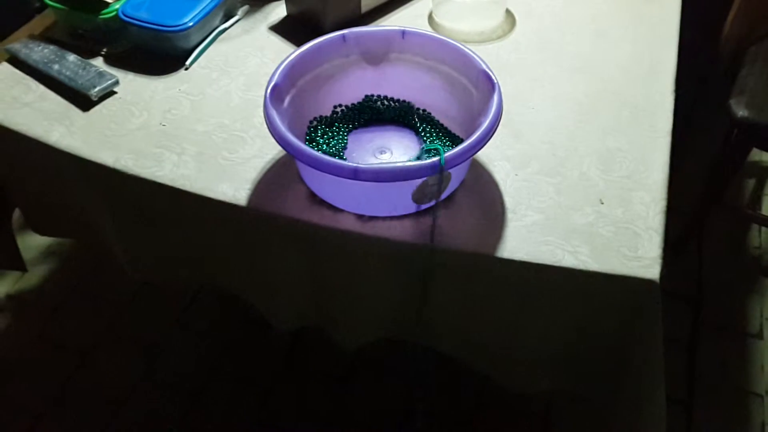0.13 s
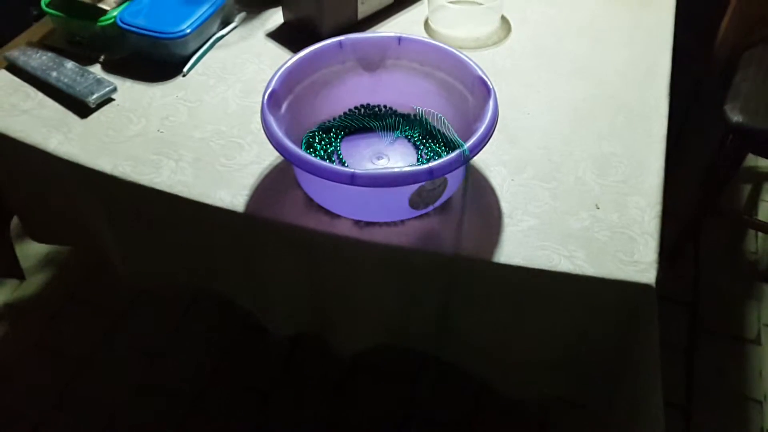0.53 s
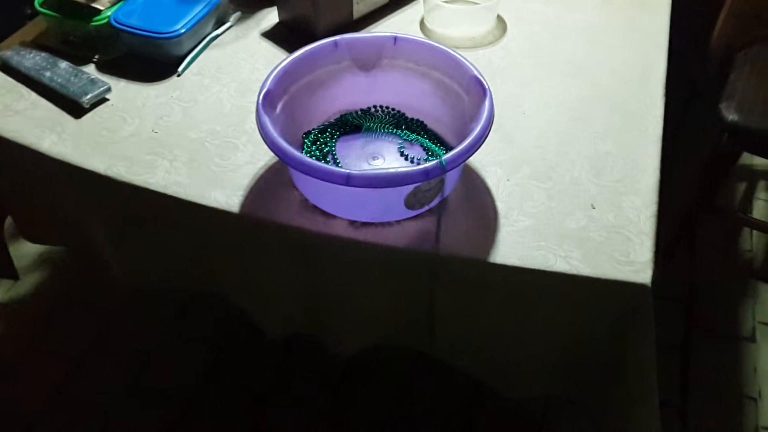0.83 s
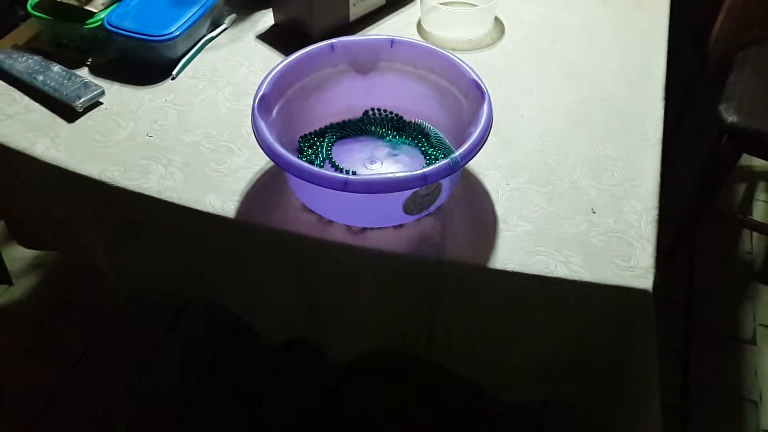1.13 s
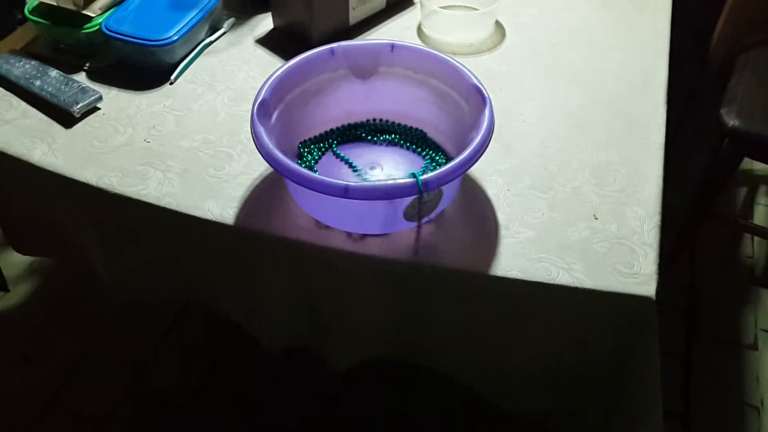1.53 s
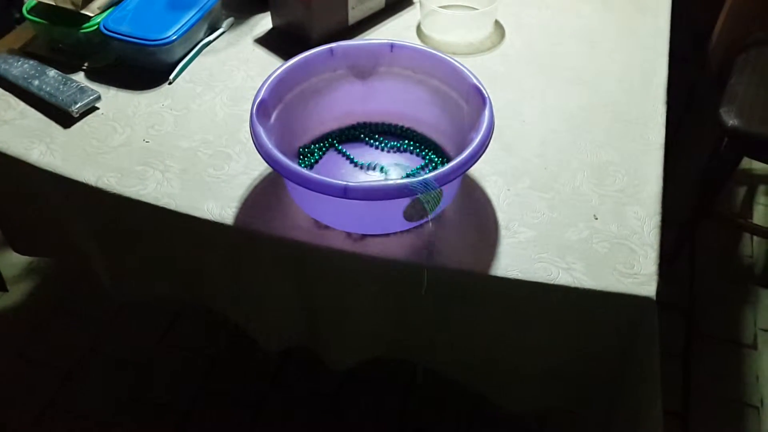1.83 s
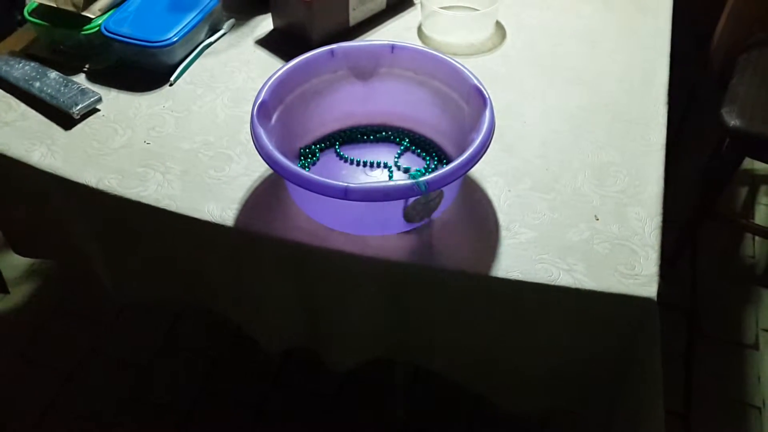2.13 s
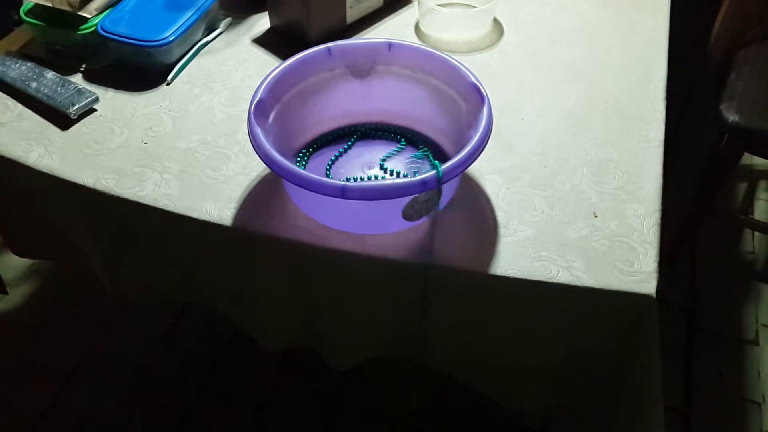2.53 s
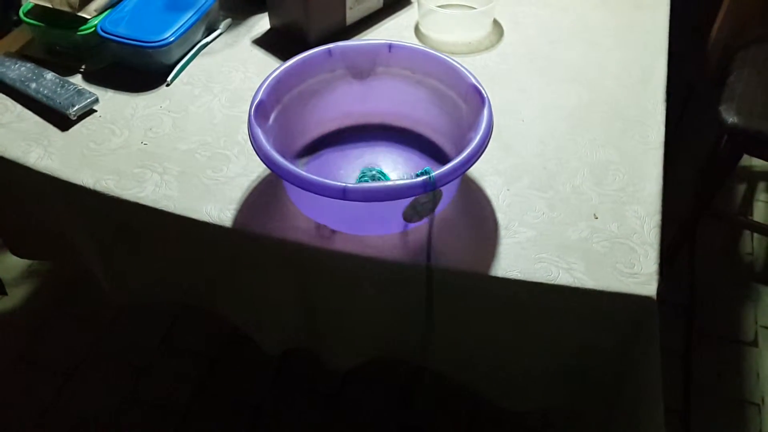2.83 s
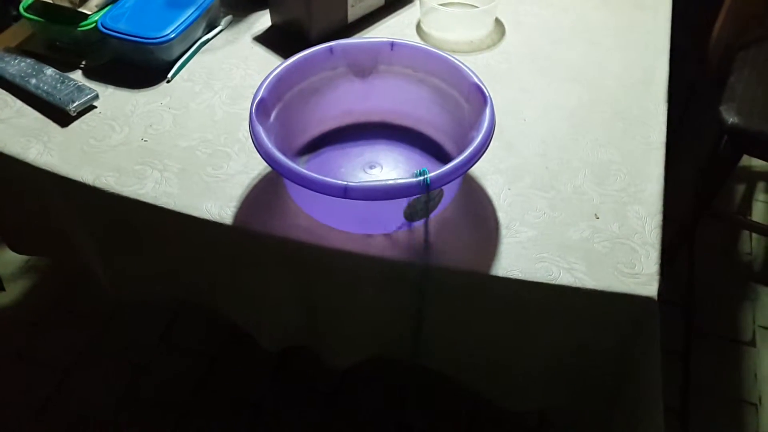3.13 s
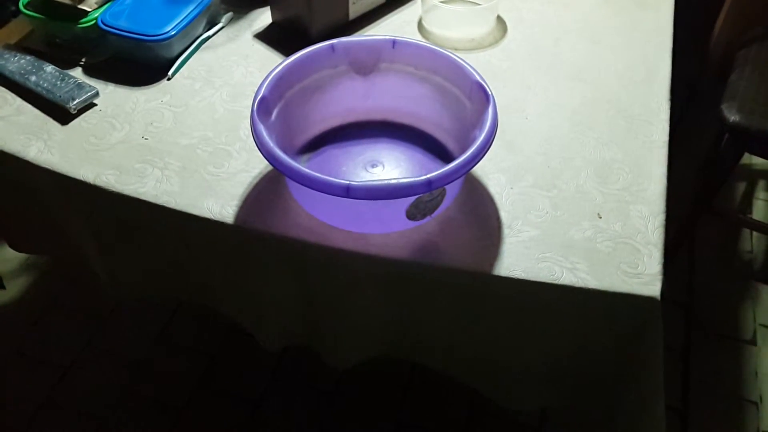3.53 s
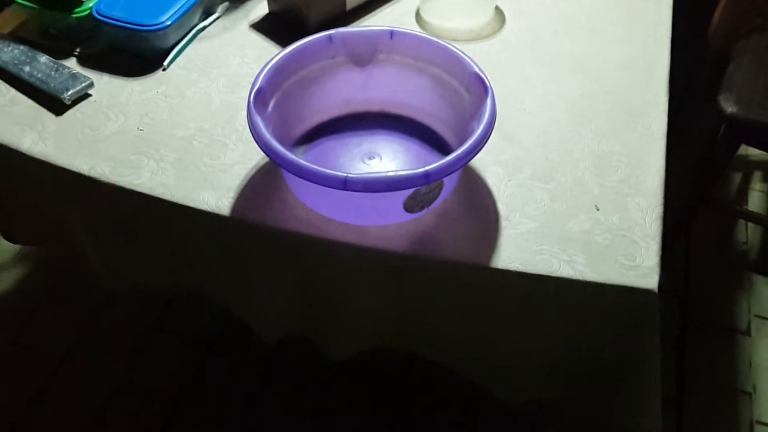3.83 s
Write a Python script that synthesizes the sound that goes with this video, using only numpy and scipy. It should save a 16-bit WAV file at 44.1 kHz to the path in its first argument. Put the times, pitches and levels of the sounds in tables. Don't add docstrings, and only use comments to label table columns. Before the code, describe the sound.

A bead chain rattles rapidly over a plastic bowl's rim, then clicks out onto the floor.

```python
import sys
import numpy as np
from scipy import signal
from scipy.fft import rfft, irfft, next_fast_len
from scipy.io import wavfile
from scipy.ndimage import uniform_filter1d

SR = 44100
rng = np.random.default_rng(int(sys.argv[2]) if len(sys.argv) > 2 else 0)


def gain_from_db(level_db):
    decades = np.asarray(level_db, float) / 20
    return 10 ** decades


def bounce(signal):
    frames = np.transpose(np.atleast_2d(signal))
    limited = np.clip(frames, -1, 1)
    pcm = np.round(limited * 32767).astype(np.int16)
    wavfile.write(sys.argv[1], SR, pcm)


N = 176400
T = np.arange(N) / SR
SIZE = next_fast_len(N + SR // 2)
HZ = np.arange(SIZE // 2 + 1) * SR / SIZE

HEAP_END_S = 3.56
CLICK_S, TICK_T60_S = .004, .002
CRACK_DB = 11.5


def unit(x):
    return x / np.sqrt(np.sum(x ** 2, axis=-1, keepdims=True))


def highpass(hz):
    return 1j * HZ / (hz + 1j * HZ)


def colour(points):
    hz, db = np.array(points, float).T
    log_gain = np.interp(np.log(HZ + 1), np.log(hz), db) * np.log(10) / 20
    cepstrum = irfft(log_gain, SIZE)
    cepstrum[1:SIZE // 2] *= 2
    cepstrum[SIZE // 2 + 1:] = 0
    return np.exp(rfft(cepstrum))


def pair(length, t60):
    t = np.arange(int(length * SR)) / SR
    bursts = unit(rng.standard_normal((3, len(t))) * 1000. ** (-t / t60))
    shared, left, right = rfft(bursts, SIZE)
    alike = 1 / (1 + (HZ / 804) ** 3)
    return np.sqrt(alike) * shared + np.sqrt(1 - alike) * np.array([left, right])


def clicks(rate, scatter_db):
    moment, size = rng.random((2, N))
    level_db = np.minimum(-np.log(size + 1e-9), 3) * scatter_db
    x = (moment < rate / SR) * gain_from_db(level_db) * rng.choice([-1, 1], N)
    return x / x.std()


def judder():
    hold = int(SR / 220)
    step = np.tanh(rng.standard_normal(N // 100))
    return gain_from_db(3.5 * uniform_filter1d(np.repeat(step, hold)[:N], hold // 4))


# (frequency [Hz], level [dB])
AIR_COLOUR = [(25, -27), (60, -4), (110, 2), (170, 2.5), (500, -8), (2000, -16.5), (8000, -19.5),
              (16000, -38)]


def air():
    mid, side = rfft(rng.standard_normal((2, SIZE))) * colour(AIR_COLOUR)
    opposite = np.array([[1], [-1]])
    x = irfft(mid + side * highpass(400) ** 2 * opposite, SIZE)[:, :N]
    hum = gain_from_db(-72) * np.sin(2 * np.pi * 122 * T)
    return gain_from_db(-59.5) * x / x.std() + hum


def room():
    low = 1 / (1 + (HZ / 1750) ** 2)
    tail = low * pair(0.43, 0.38) + (1 - low) * pair(0.54, 0.27)
    return 1 + gain_from_db(-4) * tail * np.exp(-2j * np.pi * HZ * .004)


# (start [s], end [s], level [dB]); end before start = lone click
LANDINGS = [
    (3.563, 3.7, -48),
    (3.684, 3.717, -36.5),
    (3.721, 3.6, -39.5),
    (3.742, 3.795, -24.5),
    (3.804, 3.8, -44),
    (3.9, 3.89, -25),
    (3.92, 3.925, -39),
    (3.962, 3.9, -45.5),
    (3.981, 3.93, -32.5),
    (3.995, 4.005, -39),
]
# (time [s], peak level [dB])
DROPS = [(3.6496, -32), (3.685, -21.5), (3.6884, -27), (3.6914, -23), (3.7446, -17), (3.752, -18),
         (3.7584, -17), (3.7654, -21), (3.7733, -15), (3.7784, -18), (3.783, -14), (3.7874, -14),
         (3.7904, -20), (3.8694, -31), (3.8737, -32.5)]
# (frequency [Hz], level [dB])
HEAP_COLOUR = [(500, -41), (2500, -21.5), (4500, -15), (5700, -10), (8000, 5.5), (11000, 8.5),
               (15000, 10.5)]


def heap(spots=2):
    landing = sum(gain_from_db(db) * (T >= start) * (T < end) for start, end, db in LANDINGS)
    first = np.zeros(N)
    for start, _, db in LANDINGS:
        first[int(start * SR)] = gain_from_db(db + CRACK_DB)
    for s, db in DROPS:
        first[int(s * SR)] = gain_from_db(db + 12.5)
    screen = (1 - highpass(8800)) ** 2
    out = 0
    for _ in range(spots):
        beads = clicks(4000 / spots, 3.5)
        running = rfft(gain_from_db(-30) * (T < HEAP_END_S) * judder() * beads, SIZE) * screen
        ending = rfft(landing * beads + first, SIZE)
        out = out + (running + ending) * pair(CLICK_S, TICK_T60_S) * room()
    return colour(HEAP_COLOUR) * out


# (time [s], level [dB], pitch [Hz], t60 [s])
KNOCKS = [(0.722, -31, 1030, 0.084), (1.131, -14.5, 670, 0.02), (1.141, -29, 493, 0.012),
          (1.313, -29.5, 1018, 0.2), (1.889, -27, 443, 0.095), (2.48, -30, 527, 0.091),
          (2.792, -25.5, 444, 0.11), (3.02, -15, 980, 0.0087), (3.024, -15, 1500, 0.019),
          (3.061, -20.5, 302, 0.024), (3.944, -46, 615, .02)]


def knocks():
    x = 0
    for s, db, hz, t60 in KNOCKS:
        ring = np.sin(2 * np.pi * hz * (T - s)) * 1000. ** (-np.abs(T - s) / t60)
        x = x + gain_from_db(db) * (T >= s) * ring
    return rfft(x, SIZE)


def gate(start, end):
    rise_s, lift_s = 0.0073, 0.016
    return np.clip((T - start) / rise_s, 0, 1) * np.exp(-np.maximum(T - end, 0) / lift_s)


# (start [s], end [s], bead level [dB], bowl ring level [dB])
RIDES = [(-.05, 0.174, -19.5, -27.5), (0.2, 0.432, -20.5, -28.5), (0.46, 0.61, -21, -28.5),
         (0.618, 0.734, -19.5, -27.5), (0.816, 0.924, -22, -29), (0.946, 1.036, -18, -29),
         (1.094, 1.16, -30, -33.5), (1.183, 1.225, -25.5, -38), (1.25, 1.359, -19, -27.5),
         (1.411, 1.518, -20.5, -30.5), (1.526, 1.641, -21.5, -29), (1.677, 1.828, -20.5, -26.5),
         (1.848, 1.913, -19.5, -28), (2.01, 2.19, -19.5, -27.5), (2.287, 2.384, -19.5, -31.5),
         (2.422, 2.54, -21.5, -30.5), (2.598, 2.667, -17.5, -25.5), (2.67, 2.914, -22, -28.5),
         (2.936, 3.067, -20, -27), (3.082, 3.341, -20.5, -26.5), (3.37, 3.431, -22.5, -24.5),
         (3.485, 3.544, -20, -29)]
# (time [s], peak level [dB], bowl ring level [dB], fade [s])
SLAPS = [(.038, -13.5, -3.5, 0.014), (.203, -1.5, -11, 0.0045), (.218, 1, -6.5, 0.0072),
         (.469, -2.5, -9, 0.016), (.52, -4.5, -6, 0.018), (.582, -13, -1.5, 0.021),
         (.829, -2.5, -8.5, 0.011), (.898, -7, -9, 0.0034), (1.1, -1, -13.5, 0.043),
         (1.19, 3, -14.5, 0.018), (1.252, -0.5, -19, 0.0081), (1.41, 4.5, -16, 0.0055),
         (1.628, 3.5, -20, 0.0056), (1.67, -1, -18, .004), (1.706, -5.5, -2.5, 0.011),
         (1.776, -9, -7, 0.011), (2.009, 2, -11, 0.017), (2.072, -2, -26, 0.011), (2.272, 4.5, -17, 0.0035),
         (2.282, -1, -6.5, 0.011), (2.365, 1.5, -7, 0.0036), (2.461, 3.5, -16.5, 0.0054),
         (2.606, 1.5, -13.5, 0.012), (2.619, 0.5, -6.5, 0.0045), (2.696, 2, -32, 0.014),
         (2.744, -2.5, -22, 0.038), (2.952, 6, -39, 0.0024), (3.425, 6.5, -25, 0.0032),
         (3.476, 4, -9.5, 0.0043), (3.509, 6, -12.5, 0.0031)]
# (time [s], peak level [dB], bowl ring level
# [dB])
FURTHER_SLAPS = [(0.0303, -19, -19), (0.2603, -10, -14), (0.4775, -5.5, -9), (0.6258, -10, -8), (0.694, -7, -15),
                 (0.9512, -18, -15), (0.992, -8, -15), (1.1316, -3, -14), (1.1718, -8.5, -15.5), (1.3029, -12, -18),
                 (1.3678, -12, -15), (1.4199, -7, -16), (1.4535, -8.5, -11.5), (1.5025, -12, -16),
                 (1.5589, -3, -13), (1.8507, -11, -16), (1.873, -4, -12), (1.916, -13, -26), (2.0013, -16, -18),
                 (2.1121, -14, -19), (2.1291, -17, -14), (2.1794, -10, -15), (2.259, -9, -8.5), (2.3211, -6.5, -6),
                 (2.4059, -9, -21), (2.486, -10, -20), (2.5048, -11, -10), (2.5234, -8, -17), (2.7034, -6, -16),
                 (2.7084, -9, -20), (2.759, -9, -7), (2.7784, -3, -9), (2.92, -12, -18), (3.0815, -10, -8),
                 (3.1106, -9, -8), (3.119, -10, -16), (3.1623, -5.5, -7.5), (3.1921, -9, -6), (3.2067, -7, -17),
                 (3.2203, -9.5, -5), (3.2664, -11, -7), (3.2924, -10, -19), (3.3717, -6.5, -13), (3.3954, -6, -13)]


def chain_force(count):
    rustle = gain_from_db(2 * -37.5) * (T < HEAP_END_S)
    bead = rustle + sum(gain_from_db(2 * db) * gate(start, end) ** 2 for start, end, db, _ in RIDES)
    ring = rustle + sum(gain_from_db(2 * db) * gate(start, end) ** 2 for start, end, _, db in RIDES)
    bead = judder() ** 2 * bead
    boom, ring = judder() ** 2 * ring, judder() ** 2 * ring
    cracks = np.zeros((count, N))
    slap_db, slap_ring_db, tick_db, tick_fade_s = -13, 7.5, 5.5, .003
    further_slaps = [(s, db + tick_db, ring_db, tick_fade_s) for s, db, ring_db in FURTHER_SLAPS]
    for k, (s, db, ring_db, fade) in enumerate(SLAPS + further_slaps):
        i = int(s * SR)
        slap = gain_from_db(2 * (db + slap_db)) * np.exp(-2 * T[:min(8192, N - i)] / max(fade, .002))
        bead[i:i + 8192] += slap
        ring[i:i + 8192] += slap * gain_from_db(2 * (ring_db + slap_ring_db))
        cracks[k % count, i] = gain_from_db(db + slap_db + CRACK_DB)
    slow = uniform_filter1d((boom + ring) / 2, int(0.013 * SR))
    boom = gain_from_db(-0.5) * np.sqrt(slow + 1e-12)
    return bead, boom, ring, cracks


# (time [s], frequency [Hz])
WALL = [(0.0, 2490), (0.13, 2140), (0.22, 2370), (0.39, 2150), (0.42, 2410), (1.03, 2135), (1.09, 2435),
        (1.56, 2246), (1.91, 2230), (2.01, 2470), (2.09, 2180), (2.27, 2290), (2.85, 2160), (2.9, 2400),
        (3.01, 2070), (3.18, 2325), (3.3, 2235), (3.55, 2210)]


def nearness(places):
    reach_hz = 170
    pitch = np.interp(T, *np.array(WALL).T)
    near = np.exp(-((pitch - places[:, None]) / reach_hz) ** 2)
    return near * np.sqrt(len(places) / np.sum(near ** 2, axis=0))


# (frequency [Hz], level [dB], t60 [s])
BOWL = [(340, -13.5, 0.038), (475, -14, 0.048), (613, -12.5, 0.063), (761, -20, 0.046), (900, -20, 0.063),
        (1026, -25.5, 0.052), (1210, -10, 0.01), (1515, -12.5, 0.064), (1884, -5, 0.011),
        (2130, 0.5, 0.013), (2327, 0, 0.015), (2462, -1.5, 0.0093), (2770, -4, 0.005), (3110, -8.5, 0.0035)]


def bowl(place):
    f, db, t60 = np.array(BOWL).T[:, :, None]
    t, wall = T[:4096], f > 1700
    tune, share = rng.uniform(-1, 1, (2, len(BOWL), 1))
    hz = f * (1 + 0.029 * tune) * np.where(wall, place / 2250, 1)
    modes = share * gain_from_db(db) / np.sqrt(t60) * np.sin(2 * np.pi * hz * t) * 1000. ** (-t / t60)
    modes = modes / np.sqrt(np.sum(modes.sum(axis=0) ** 2))
    return rfft((modes * ~wall).sum(axis=0), SIZE), rfft((modes * wall).sum(axis=0), SIZE)


def rim(count=8):
    bead, boom, ring, cracks = chain_force(count)
    places = np.linspace(2020, 2600, count)
    near = nearness(places)
    tails, thin = [room(), room()], highpass(2180) ** 2
    own_share = 0.78
    out = 0
    for crack, place, weight, tail in zip(cracks, places, near, tails * count):
        heard, own, low = (clicks(2400 / count, 3) / np.sqrt(count) for _ in range(3))
        low_modes, wall_modes = bowl(place)
        struck = np.sqrt(ring) * weight * ((1 - own_share) * heard + own_share * own)
        rattle = rfft(heard * np.sqrt(bead) + crack, SIZE) * pair(CLICK_S, TICK_T60_S) * thin
        wall_ring = rfft(struck, SIZE) * wall_modes
        low_ring = rfft(boom * low, SIZE) * low_modes
        out = out + tail * (rattle + wall_ring + low_ring)
    return out


# (frequency [Hz], level [dB])
PORT_LEFT = [(150, -12), (500, 1), (2300, -1), (4000, 0.5), (7500, 1.5), (10000, -3.5), (12000, -12),
             (15000, -10.5)]
# (frequency [Hz], level [dB])
PORT_RIGHT = [(150, -9), (500, 3.5), (2300, 4.5), (4200, 7.5), (5650, 15), (7000, 4), (9000, -12),
              (15000, -13.5)]


def ports():
    return np.array([colour(PORT_LEFT), colour(PORT_RIGHT)]) * gain_from_db(-2) * highpass(250) ** 2


def scene():
    echo = 1 - gain_from_db(-8.5) * np.exp(-2j * np.pi * HZ * .0064) * (1 - highpass(1800))
    sources = rim() + knocks() * room() + heap()
    return irfft(sources * echo * ports(), SIZE)[:, :N] + air()


def band_limit(x):
    return signal.sosfilt(signal.butter(12, 16300, fs=SR, output="sos"), x)


def record(dry):
    soft = dry / (1 + (dry / .95) ** 4) ** .25
    top_cut = signal.ellip(8, .2, 60, 15150, fs=SR, output="sos")
    mix = signal.sosfilt(top_cut, soft)
    return band_limit(mix)


dry = scene()
out = record(dry)
bounce(out)
```